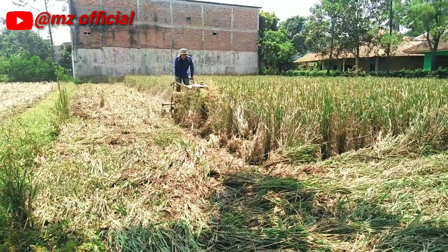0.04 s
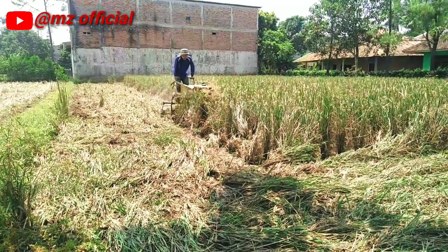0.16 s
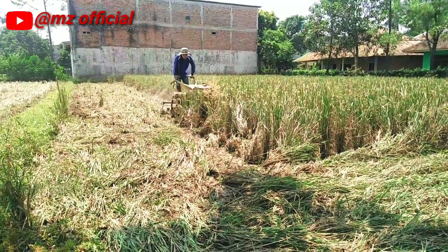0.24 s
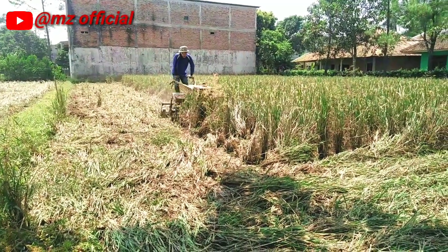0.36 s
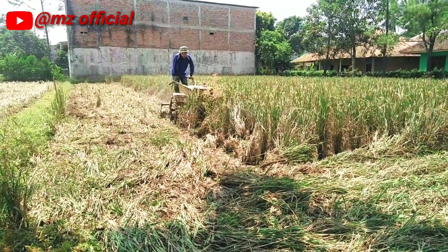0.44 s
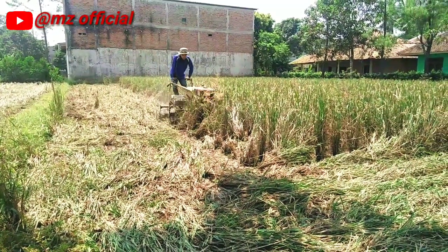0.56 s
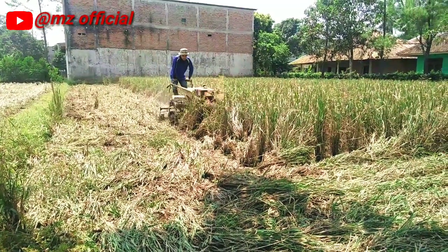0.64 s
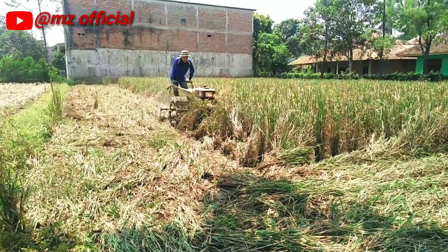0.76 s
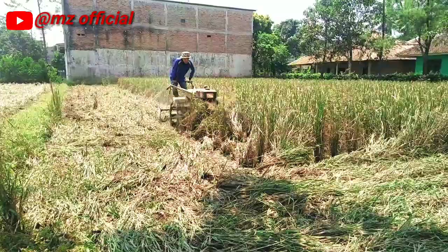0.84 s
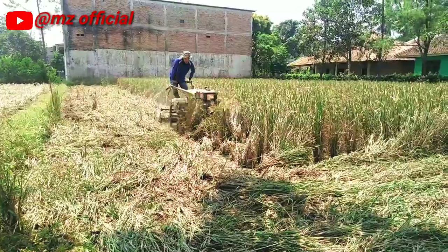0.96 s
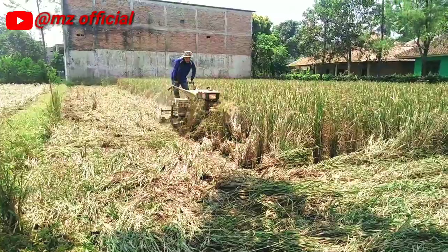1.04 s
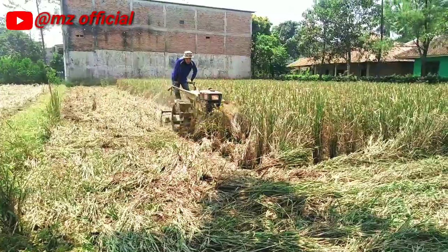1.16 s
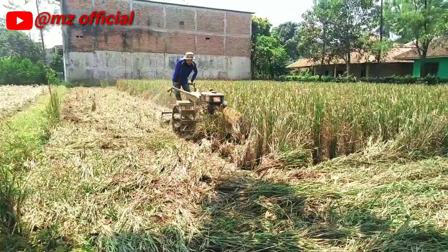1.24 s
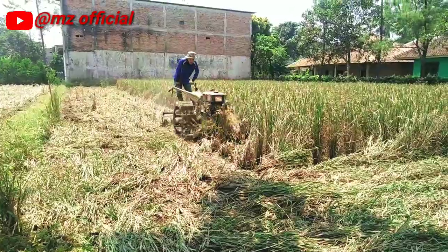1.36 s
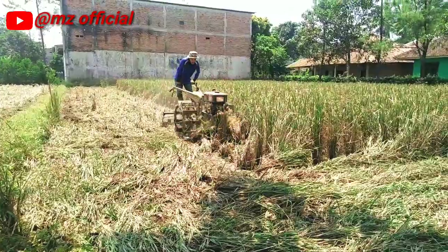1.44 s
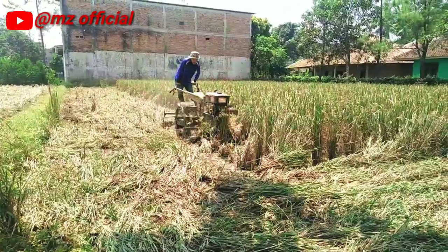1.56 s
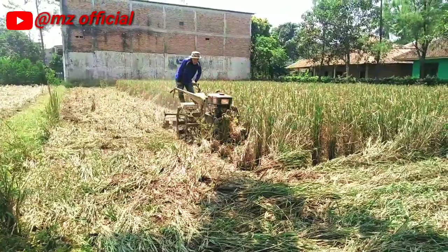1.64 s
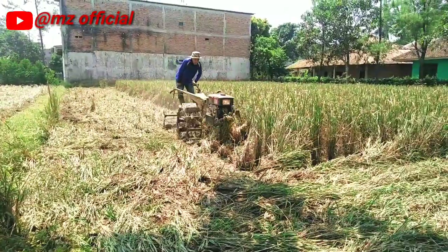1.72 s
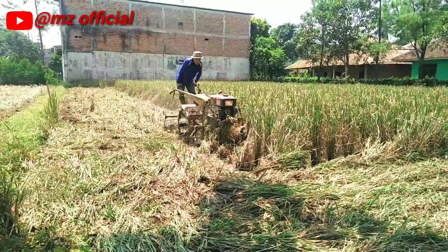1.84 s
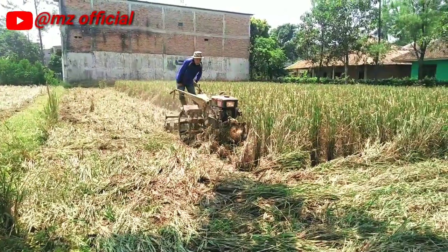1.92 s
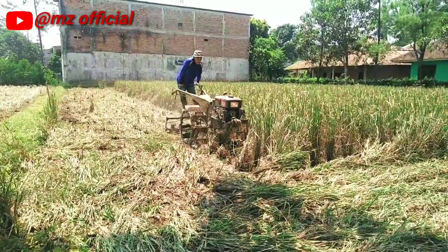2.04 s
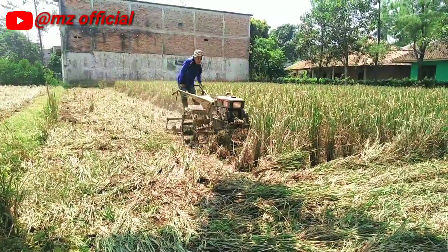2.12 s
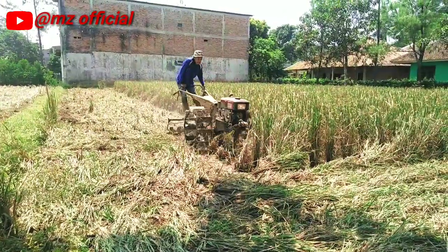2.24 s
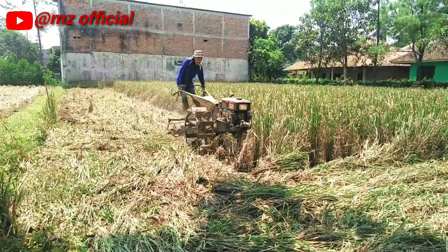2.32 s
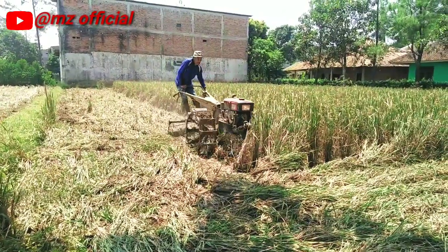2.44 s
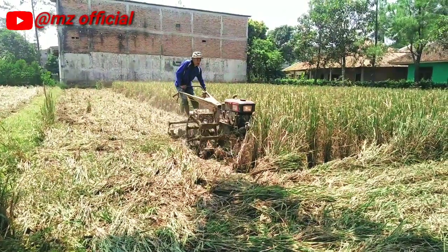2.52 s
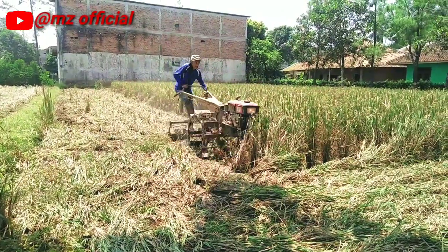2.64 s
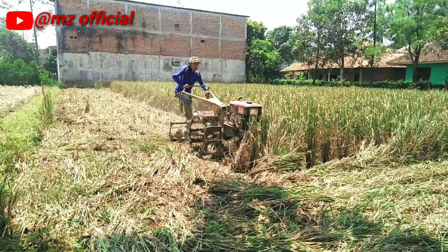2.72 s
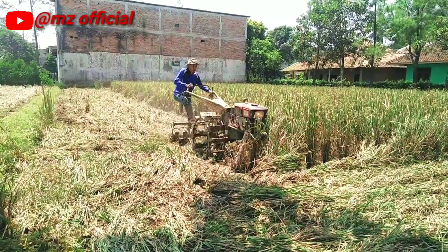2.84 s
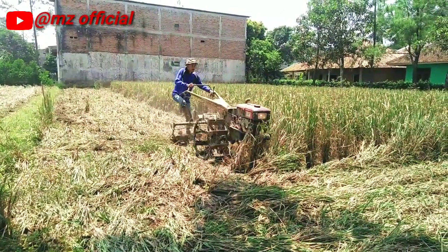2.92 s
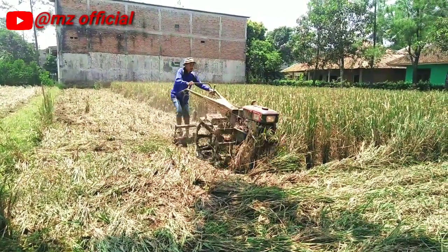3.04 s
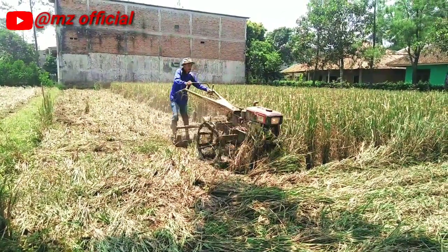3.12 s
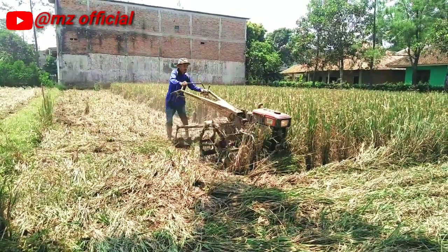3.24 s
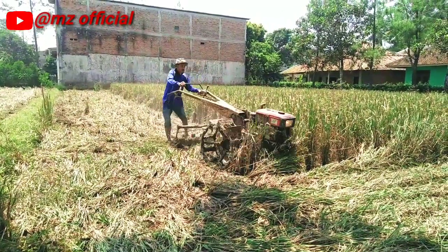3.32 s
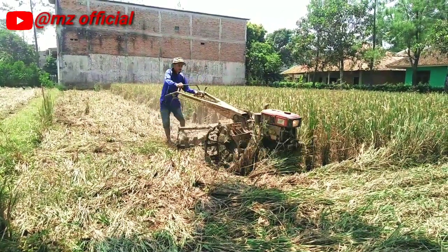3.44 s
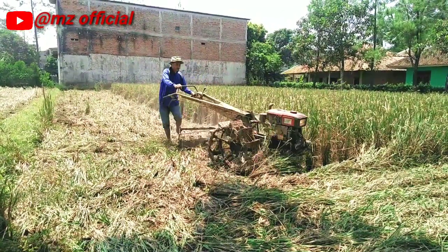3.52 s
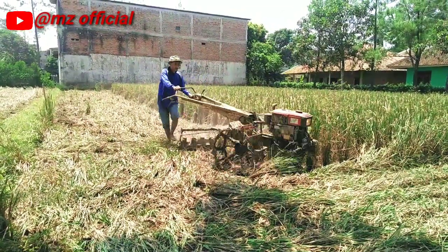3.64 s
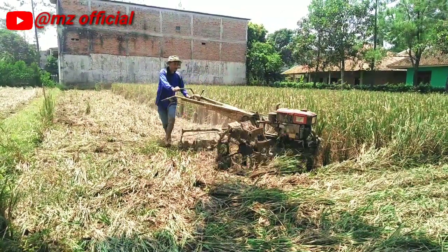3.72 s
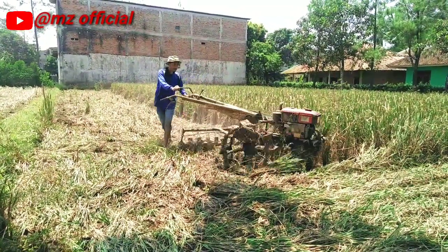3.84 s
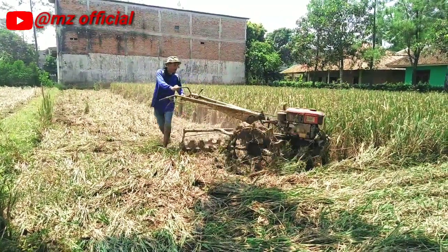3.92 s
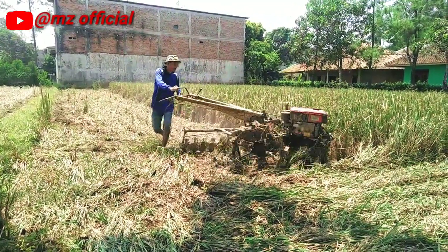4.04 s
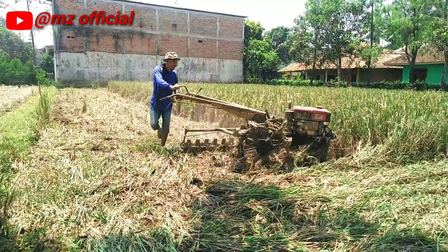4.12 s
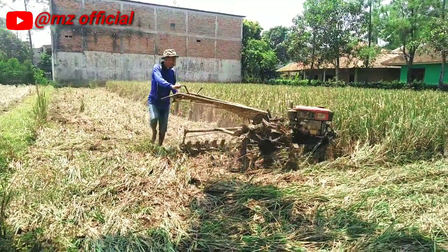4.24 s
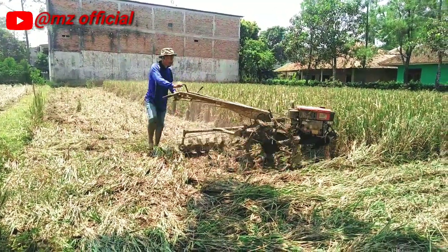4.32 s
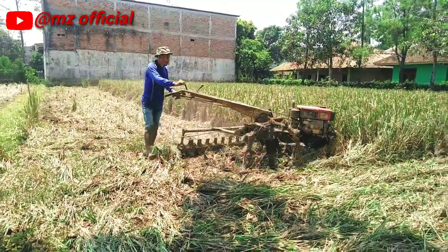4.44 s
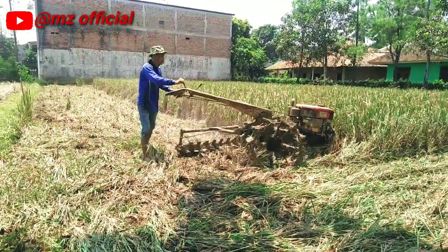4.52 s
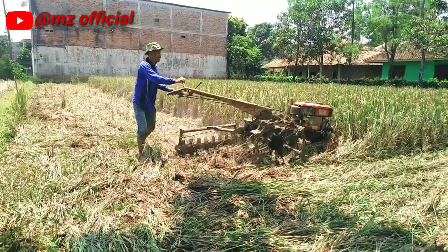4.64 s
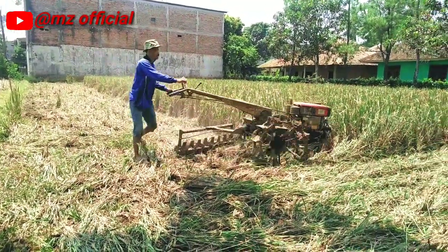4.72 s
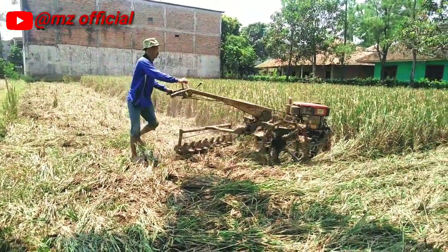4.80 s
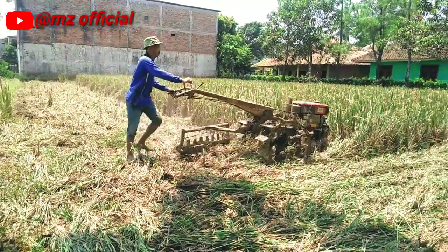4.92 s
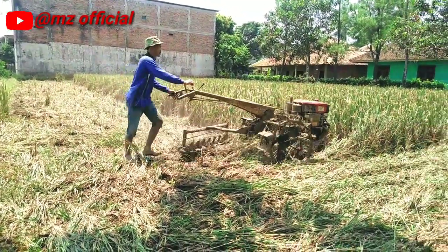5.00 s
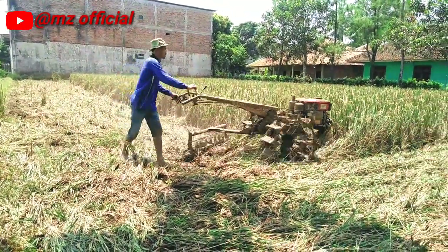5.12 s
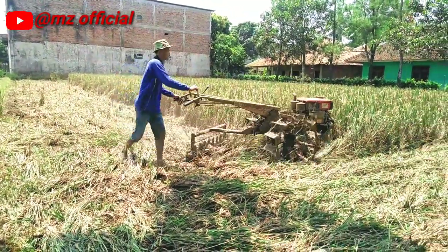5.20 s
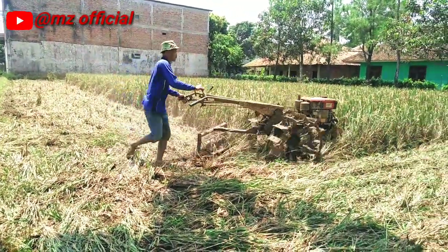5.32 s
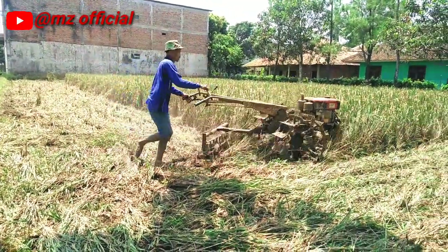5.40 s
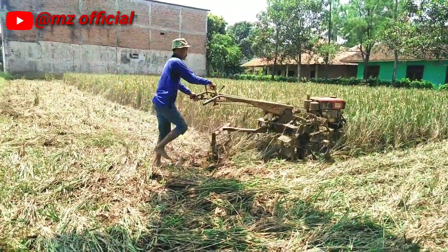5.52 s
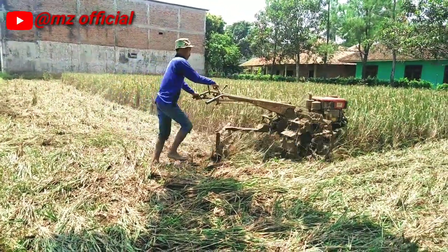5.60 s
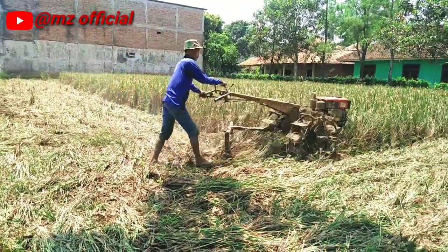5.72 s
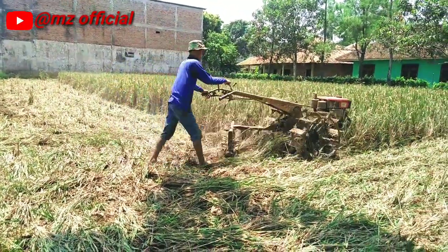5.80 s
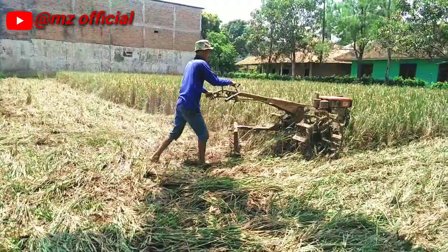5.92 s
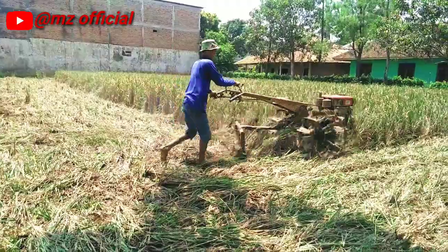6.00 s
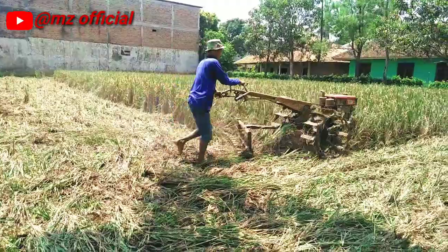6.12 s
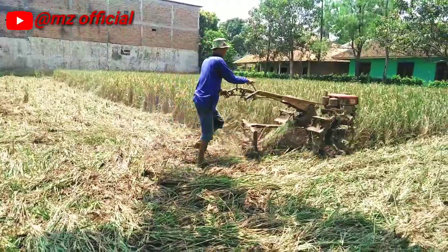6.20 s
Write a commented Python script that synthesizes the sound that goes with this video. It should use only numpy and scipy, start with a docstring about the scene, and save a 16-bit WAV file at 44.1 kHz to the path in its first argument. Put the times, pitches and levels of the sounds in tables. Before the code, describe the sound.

A one-cylinder diesel walking tractor runs throughout in an open field, beating about 11.6 times a second at a nearly steady speed with tiny wavers. Each beat joins a low, rounded exhaust thud to a short, dry metallic knock and clatter. From 0 to 3 seconds it draws nearer, growing louder and fuller, the knock hardest near 2.8, then easing slightly. Gear rumble pulses underneath; a thin whine sweeps past around 4.2. Loose metal rattles at 3.0-3.2, 4.9-5.5 and briefly around 5.9-6.2. Fine straw crackle stays faint, with small crunches at 4.7, 5.2, 5.9 and 6.1. The exposed microphone carries faint steady hiss and low wind gusts near 0.4, 1.9, 2.5, 2.9 and most strongly 4.2-4.8. Dull bumps land around 0.5, 2.5, 2.9, 4.2, 4.6 and softly 5.9. The engine is still running close by when it ends at 6.3.

```python
"""In a field of rice straw, a walking tractor with a single-cylinder four-stroke diesel crawls closer.
Each engine cycle excites air columns for exhaust and intake, and noise through metal resonances for the knock.
Gears rumble through frame resonances and whine in step with the crank; straw is clumped random snaps.
Loose parts rattle; shaped noise makes wind buffeting and hiss, and short decaying sines make dull bumps."""
import sys
import numpy as np
from scipy import signal
from scipy.fft import rfft, irfft
from scipy.io import wavfile

SR = 44100
rng = np.random.default_rng(int(sys.argv[2]) if len(sys.argv) > 2 else 0)


def log_audio(samples):
    """Write samples as a 16-bit WAV file to the path given in sys.argv[1]."""
    # one column per channel
    frames = np.atleast_2d(samples).T
    # limit to full scale, then quantise
    limited = np.clip(frames, -1, 1)
    pcm = np.round(limited * 32767).astype(np.int16)
    wavfile.write(sys.argv[1], SR, pcm)


N = 276066
TIME = np.arange(N) / SR


def from_db(db):
    """Decibels to amplitude."""
    return 10 ** (np.asarray(db) / 20)


def rms_one(x):
    """Scale a signal to an rms of 1."""
    return x / np.sqrt(np.mean(x ** 2) + 1e-20)


def in_time(rows):
    """Each column of a curve, sample by sample."""
    s, *columns = np.transpose(rows)
    return [np.interp(TIME, s, c) for c in columns]


def coloured_noise(points):
    """Noise with the given spectrum; rms 1."""
    hz, db = np.transpose(points)
    bins_hz = np.arange(N // 2 + 1) * SR / N
    gain = from_db(np.interp(np.log(bins_hz + 1e-9), np.log(hz), db))
    return rms_one(irfft(rfft(rng.standard_normal(N)) * gain, N))


def resonate(x, hz, width_hz):
    """One two-pole resonance, scaled so white noise keeps its rms."""
    radius = np.exp(-np.pi * width_hz / SR)
    zeros = np.sqrt((1 - radius ** 2) / 2) * np.array([1, 0, -1])
    poles = [1, -2 * radius * np.cos(2 * np.pi * hz / SR), radius ** 2]
    return signal.lfilter(zeros, poles, x)


def cut(x, hz, kind, order):
    """Butterworth low- or high-pass."""
    return signal.sosfilt(signal.butter(order, hz, kind, fs=SR, output="sos"), x)


def swell(age, rise_s, decay_s):
    """A rounded onset and an exponential decay."""
    return (1 - np.exp(-(age / rise_s) ** 2)) * np.exp(-age / decay_s)


def flares(events, rise_s, decay_s):
    """Summed power of short swells, each at most one second long."""
    power = np.zeros(N)
    shape = swell(TIME[:SR], rise_s, decay_s) ** 2
    for s, db in events:
        start = int(s * SR)
        power[start:start + SR] += from_db(db) ** 2 * shape[:N - start]
    return power


def recurring(cycles, period, degrees, spread_db):
    """Age in s and strength of the two latest events at one crank angle."""
    number, part = np.divmod(cycles - degrees / 720 + 4, 1)  # +4 keeps early event numbers positive
    strength = from_db(spread_db * rng.standard_normal(128))
    return [((part + back) * period, strength[number.astype(int) - back]) for back in (0, 1)]


def chatter(cycles, repeat_share):
    """Fine metal contacts: part of their noise pattern comes back in every cycle."""
    pattern = rng.standard_normal(3800)
    locked = pattern[(cycles % 1 * len(pattern)).astype(int) % len(pattern)]
    share = np.clip(repeat_share, 0, 1)
    return np.sqrt(share) * locked + np.sqrt(1 - share) * rng.standard_normal(N)


def body(drive, modes, near):
    """Modes in parallel; each radiates differently as the machine rocks and turns its side."""
    out = np.zeros(N)
    for hz, width_hz, far_db, near_db in modes:
        rocking = np.interp(TIME, np.linspace(0, TIME[-1], 40), rng.standard_normal(40))
        level_db = far_db + near * (near_db - far_db) + 1.3 * rocking
        out += from_db(level_db) * resonate(drive, hz, width_hz)
    return out


def ground_dip(x, hz, width_hz, depth):
    """The ground reflection weakens one narrow band; depth 1 would cancel its centre."""
    notched = signal.lfilter(*signal.iirnotch(hz, hz / width_hz, fs=SR), x)
    return x + np.clip(depth, 0, 1) * (notched - x)


# crankshaft speed: time_s, speed_rpm
CRANK_SPEED = [(0.0, 1390.0), (0.4, 1383.7), (0.8, 1398.4), (1.2, 1375.5), (1.7, 1383.0), (2.1, 1390.2),
               (2.4, 1386.7), (2.9, 1394.4), (3.3, 1411.6), (3.7, 1411.2), (4.1, 1401.0), (4.5, 1392.3),
               (4.85, 1403.5), (5.2, 1384.8), (5.55, 1364.0), (5.9, 1387.0), (6.26, 1394.2)]
START_DEG = -53.5  # crank angle after ignition at the start


def crank():
    """Cycles done and cycle length in s: a four-stroke fires once in two turns."""
    cycles_per_s = in_time(CRANK_SPEED)[0] / 120
    return np.cumsum(cycles_per_s) / SR + START_DEG / 720, 1 / cycles_per_s


# approach: time_s, nearness (0 far and head-on, 1 close and side-on; may pass 1)
NEARNESS = [(0, 0), (1.0, 0.13), (1.9, 0.37), (2.8, 0.91), (5.3, 1.21), (6.26, 1.005)]


def approach():
    """Nearness steers every machine level from its far to its near value."""
    return in_time(NEARNESS)[0]


# air pulses of one cycle: crank_deg after ignition, pitch_hz, rise_s, decay_s, far_db, near_db (relative)
# in order: exhaust blow-down, intake opens, intake closes, pipe rings on, air cleaner swells,
# upper pipe mode, a cover hums along
AIR_PULSES = [ (157.7, 98.5, 0.008, 0.0041, -12, -7.5), (370.1, 142.1, 0.006, 0.0048, -16, -12),
              (535.5, 148, 0.0059, 0.0042, -18, -12.5), (575.8, 199.6, 0.00073, 0.035, -35, -45),
              (522.8, 194, 0.013, 0.017, -34, -25.5), (586, 354.4, 0.0049, 0.0061, -33.5, -45.5),
              (587.1, 349, 0.0038, 0.018, -79, -46.5), ]
# direction of the first swing of each pulse: sign
PULSE_SIGNS = [-1, 1, -1, 1, 1, 1, 1]
GAS_DB, GAS_NEAR_DB = -0.78, 2.5  # far level, gain at nearness 1


def gas_pulses(cycles, period, near):
    """Exhaust and intake: each valve event sets an air column swinging."""
    out = np.zeros(N)
    for (degrees, hz, rise_s, decay_s, far_db, near_db), sign in zip(AIR_PULSES, PULSE_SIGNS):
        gain = sign * (from_db(far_db) * (1 - near) + from_db(near_db) * near)
        for age, strength in recurring(cycles, period, degrees, spread_db=0.63):
            swing = np.sin(2 * np.pi * hz * age)
            out += gain * strength * swell(age, rise_s, decay_s) * swing
    return from_db(GAS_DB + GAS_NEAR_DB * near) * out


# hardness of the combustion knock: time_s, gain_db
KNOCK_HARDNESS = [(0, -2), (1.0, 3.5), (2.8, 6), (3.7, 2), (6.26, 1.5)]


def knock_hardness():
    """Gain in dB shared by the metal contacts and the cylinder head's rings."""
    return in_time(KNOCK_HARDNESS)[0]


# metal contacts of one cycle: crank_deg after ignition, decay_s, level_db (relative)
METAL_CONTACTS = [(-25, 0.0038, -3.5), (11, 0.0038, 0), (44, 0.0026, -6), (66, 0.035, -13.5),
                  (209, 0.0098, -15.5), (400, 0.014, -15)]
# engine block and cover modes, before the band limits: pitch_hz, width_hz, far_db, near_db
BLOCK_MODES = [(1024, 21, -62, -61.5), (1140, 116, -56.5, -63), (1458, 91, -53.5, -54),
               (1853, 210, -67.5, -57.5), (2127, 120, -69, -66.5), (2318, 72, -62, -63.5),
               (2500, 145, -64, -62), (2933, 280, -67.5, -58), (3240, 350, -89, -59.5),
               (3950, 580, -60.5, -63.5)]
CLATTER_DB, CLATTER_NEAR_DB = -21.5, 3.5  # far level, gain at nearness 1; both drive the block


def knock(cycles, period, near, knock_db):
    """Ignition, piston slap, valves and loose fittings strike the metal over a steady clatter."""
    power = from_db(CLATTER_DB + CLATTER_NEAR_DB * near) ** 2
    for degrees, decay_s, db in METAL_CONTACTS:
        for age, strength in recurring(cycles, period, degrees, spread_db=2.12):
            strike = from_db(db + knock_db) * strength * swell(age, rise_s=0.0012, decay_s=decay_s)
            power = power + strike ** 2
    power = power + rattle_power()
    ringing = body(np.sqrt(power) * chatter(cycles, repeat_share=0.36), BLOCK_MODES, near)
    return cut(cut(ringing, hz=3565, kind="low", order=10), hz=790, kind="high", order=2)


# cylinder head rings at each ignition: pitch_hz, decay_s, far_db, near_db (before knock hardness)
HEAD_RINGS = [(478.6, 0.0057, -51, -47.5), (1032, 0.015, -55, -73), (1466, 0.0075, -47.5, -69),
              (1850, 0.0064, -62.5, -61), (2375, 0.005, -50.5, -62), (3332, 0.0034, -74, -47),
              (3650, 0.0027, -63, -53.5)]


def pings(cycles, period, near, knock_db):
    """The sudden pressure rise rings the head, a little earlier or later and harder or softer each time."""
    out = np.zeros(N)
    for hz, decay_s, far_db, near_db in HEAD_RINGS:
        # lag in cycles; each new value takes over half a cycle away from ignition
        ignition_lag = .002 * rng.standard_normal(128)[(cycles + .5).astype(int)]
        age, strength = recurring(cycles - ignition_lag, period, degrees=-5, spread_db=1.0)[0]
        ring = swell(age, rise_s=0.0029, decay_s=decay_s) * np.sin(2 * np.pi * hz * age)
        out += from_db(far_db + near * (near_db - far_db)) * strength * ring
    return from_db(knock_db) * out


# gearbox and frame modes (relative levels): pitch_hz, width_hz, far_db, near_db
FRAME_MODES = [(245, 110, -78, -57.5), (343, 46, -72.5, -53.5), (437.5, 39, -63.5, -62.5),
               (466, 39, -63, -62), (636.3, 85, -61, -55.5), (742, 30, -72, -65.5), (940, 90, -100, -66),
               (1002, 35, -63.5, -66.5)]
DRIVE_DB, DRIVE_NEAR_DB = -0.48, -1.25  # far level, gain at nearness 1


def gears(cycles, period, near):
    """The drive rumbles in the frame, pushed around ignition, exhaust and, side-on, intake opening."""
    age, strength = recurring(cycles, period, degrees=-30, spread_db=3.0)[0]
    push = 0.48 + 0.12 * near + 0.67 * strength * swell(age, rise_s=0.00031, decay_s=0.022)
    age, strength = recurring(cycles, period, degrees=336, spread_db=3.5)[0]
    push += 0.37 * near * strength * swell(age, rise_s=0.0013, decay_s=0.018)
    age, strength = recurring(cycles, period, degrees=200, spread_db=1.0)[0]
    push += 0.69 * strength * swell(age, rise_s=0.0013, decay_s=0.0084)
    ringing = body(push * chatter(cycles, repeat_share=0.31), FRAME_MODES, near)
    return from_db(DRIVE_DB + DRIVE_NEAR_DB * near) * cut(ringing, hz=956, kind="low", order=6)


# gear whine partials: periods_per_cycle, level_db (relative)
WHINE_PARTIALS = [(30, 0), (29, -9), (78.5, -20)]
WHINE_DB, WHINE_NEAR_DB = -81.5, 10  # far level, gain at nearness 1
# the whine beams sideways and sweeps past as the tractor turns
BEAM_AT_S, BEAM_WIDTH_S, BEAM_DB = 4.2, .5, -50
TORQUE_SWING = 0.47  # share of the mean


def whine(cycles, near):
    """Meshing teeth hum in step with the crank, hardest around ignition."""
    torque = 1 + TORQUE_SWING * np.cos(2 * np.pi * cycles)
    beam = from_db(BEAM_DB) * np.exp(-((TIME - BEAM_AT_S) / BEAM_WIDTH_S) ** 2)
    level = from_db(WHINE_DB + WHINE_NEAR_DB * near) + beam
    hum = sum(from_db(db) * -np.sin(2 * np.pi * order * cycles) for order, db in WHINE_PARTIALS)
    return level * torque * hum


STRAW_DB, STRAW_NEAR_DB = -85, 6  # far level, gain at nearness 1


def straw(near):
    """Stalks crush in clumps of tiny snaps."""
    clumps = rms_one(cut(rng.standard_normal(N), hz=23, kind="low", order=2))
    snaps = (rng.random(N) < 7000 / SR) * rng.standard_normal(N)  # about 7000 a second
    snaps = snaps * from_db(2.2 * np.minimum(clumps, 2))
    crackle = rms_one(cut(cut(snaps, hz=2390, kind="high", order=2), hz=6260, kind="low", order=2))
    power = from_db(STRAW_DB + STRAW_NEAR_DB * near) ** 2 + crunch_power()
    return np.sqrt(power) * crackle


# even background hiss, relative spectrum: pitch_hz, density_db per Hz
HISS_COLOUR = [(100, 18), (1000, -2.5), (3000, 2), (5000, 5), (6500, 1), (10000, 3), (13000, 0.5),
               (16000, -0.5)]


def background_hiss():
    """Steady noise at one level, strongest at the bottom of its spectrum."""
    return from_db(-74) * coloured_noise(HISS_COLOUR)


# wind rumble, relative spectrum: pitch_hz, density_db per Hz
WIND_COLOUR = [(12, -31), (25, 3), (50, -0.5), (85, 4.5), (130, 2), (200, 0), (300, -26.5), (600, -36),
               (1500, -75.5)]
# gusts on top of the breeze: start_s, level_db
WIND_GUSTS = [(0.44, -33), (1.93, -34), (2.51, -34.5), (2.87, -33), (4.22, -29.5), (4.58, -29), (4.78, -35),
              (5.66, -44)]
BREEZE_DB, BREEZE_DB_PER_S = -53, 2.0  # slowly freshening


def buffet():
    """Wind rumbles on the microphone; each gust rises quickly and dies away."""
    breeze_power = from_db(BREEZE_DB + BREEZE_DB_PER_S * TIME) ** 2
    power = breeze_power + flares(WIND_GUSTS, rise_s=0.045, decay_s=0.18)
    return np.sqrt(power) * coloured_noise(WIND_COLOUR)


# bumps at the microphone, before the low cut: start_s, pitch_hz, decay_s, level_db
MICROPHONE_BUMPS = [(0.454, 73, 0.013, -22.5), (0.484, 122, 0.015, -28), (0.549, 72, 0.0049, -20),
                    (2.5, 87, 0.012, -31), (2.508, 82, 0.0077, -11), (2.51, 234, 0.0062, -22.5),
                    (2.717, 298, 0.00056, -17.5), (2.891, 314, 0.0024, -22), (2.896, 77, 0.0046, -12.5),
                    (2.930, 116, 0.013, -20), (4.152, 117.7, 0.0057, -9), (4.152, 293, 0.0013, -15),
                    (4.165, 51, 0.022, -22), (4.225, 70, 0.0056, -15.5), (4.253, 98, 0.0038, -14.5),
                    (4.598, 70.6, 0.0055, -14.5), (4.656, 84, 0.017, -20), (5.943, 89, 0.014, -23.5)]


def bumps():
    """Dull knocks at the microphone, short decaying swings; the lower, the softer the onset."""
    out = np.zeros(N)
    for s, hz, decay_s, db in MICROPHONE_BUMPS:
        age = np.clip(TIME - s, 0, 1)
        swing = np.sin(2 * np.pi * hz * age)
        out += from_db(db) * swell(age, rise_s=0.16 / hz, decay_s=decay_s) * swing
    return cut(out, hz=34.0, kind="high", order=1)


# loose hitch and harrow rattling: start_s, level_db (drives the block modes)
HITCH_RATTLES = [(2.996, -8), (3.058, -9), (3.150, -11), (4.940, -15), (4.969, -9), (4.991, -7),
                 (5.212, -9.5), (5.302, -5.5), (5.368, -6), (5.454, -7.5), (5.925, -16), (6.150, -7)]


def rattle_power():
    """Loose hitch and harrow strike in short bursts that join the metal chatter."""
    return flares(HITCH_RATTLES, rise_s=0.00099, decay_s=0.032)


# bundles of stalks crushed under the wheels: start_s, level_db
STALK_CRUNCHES = [(4.68, -77), (5.145, -74), (5.295, -73), (5.92, -75), (6.14, -75)]


def crunch_power():
    """Whole bundles give way under the cage wheels, swelling the straw crackle."""
    return flares(STALK_CRUNCHES, rise_s=.012, decay_s=0.083)


def scene():
    """The tractor draws nearer over straw, with wind, bumps and hiss around it."""
    cycles, period = crank()
    near = approach()
    knock_db = knock_hardness()
    gas = gas_pulses(cycles, period, near)
    block = knock(cycles, period, near, knock_db) + pings(cycles, period, near, knock_db)
    drive = gears(cycles, period, near) + whine(cycles, near)
    metal = ground_dip(block + drive, hz=1282, width_hz=190, depth=0.68)
    return (gas + metal + straw(near) + background_hiss() + buffet() + bumps())[None]


def record(dry):
    """A steep elliptic low-pass cuts the top above 15550 Hz."""
    return signal.sosfilt(signal.ellip(12, .1, 90, 15550, fs=SR, output="sos"), dry)


dry = scene()
out = record(dry)
log_audio(out)
```